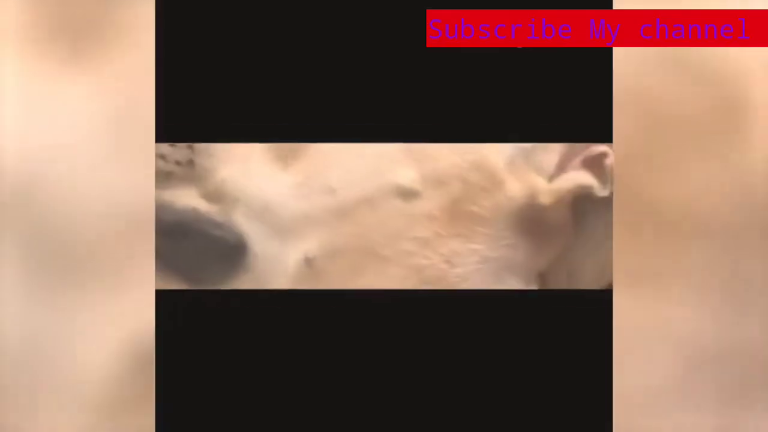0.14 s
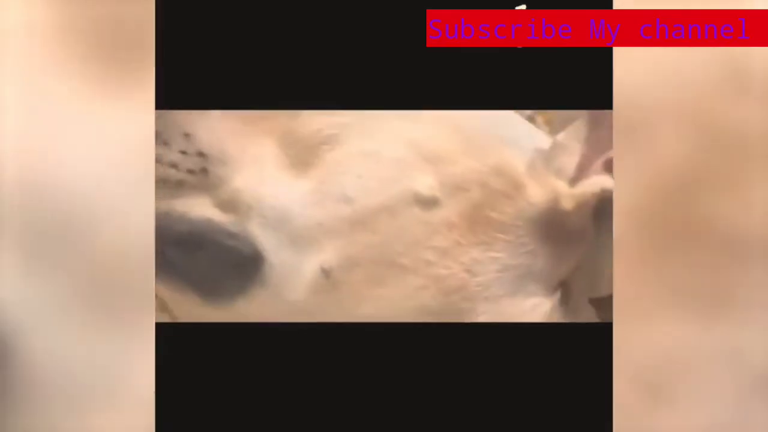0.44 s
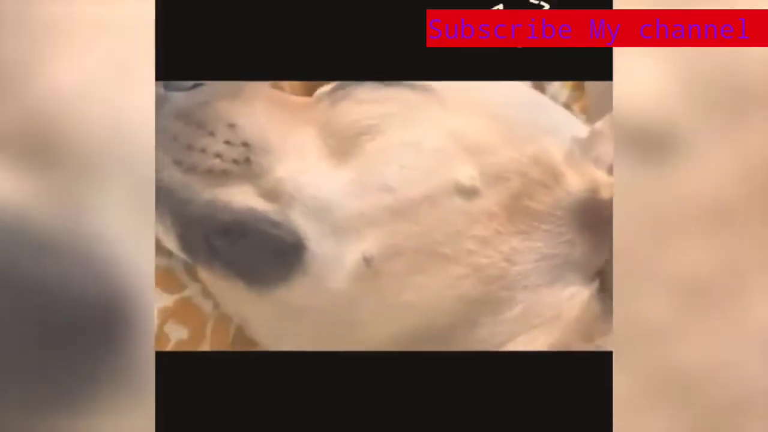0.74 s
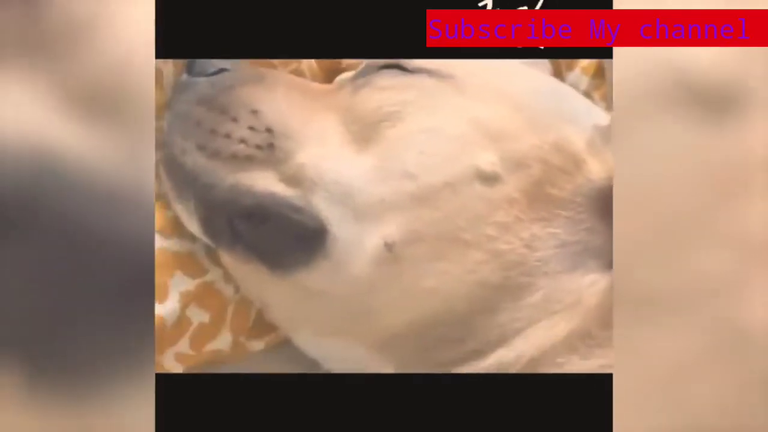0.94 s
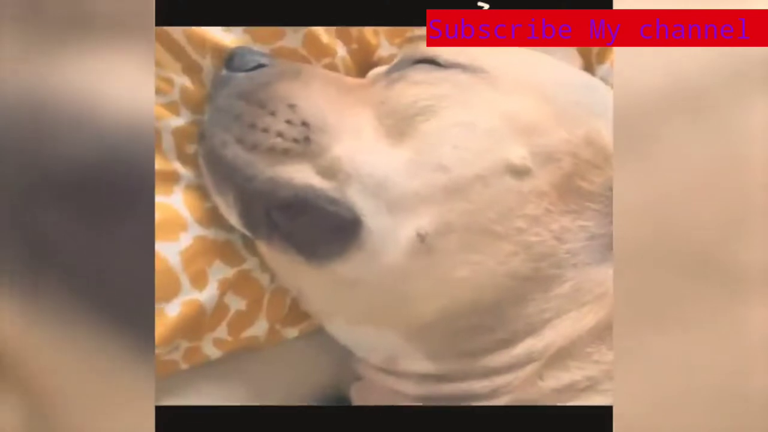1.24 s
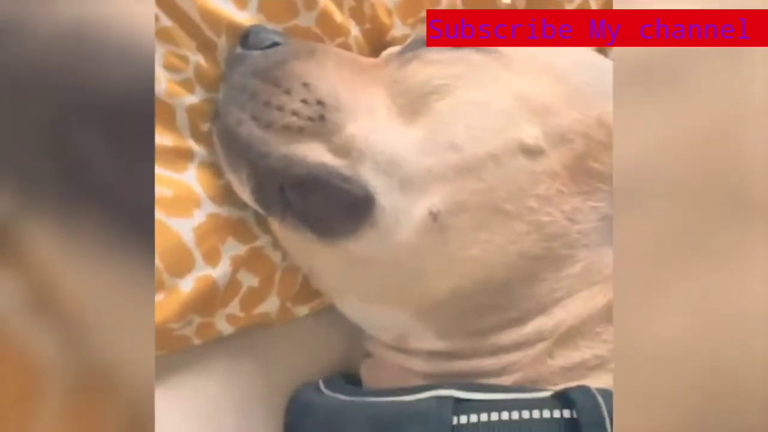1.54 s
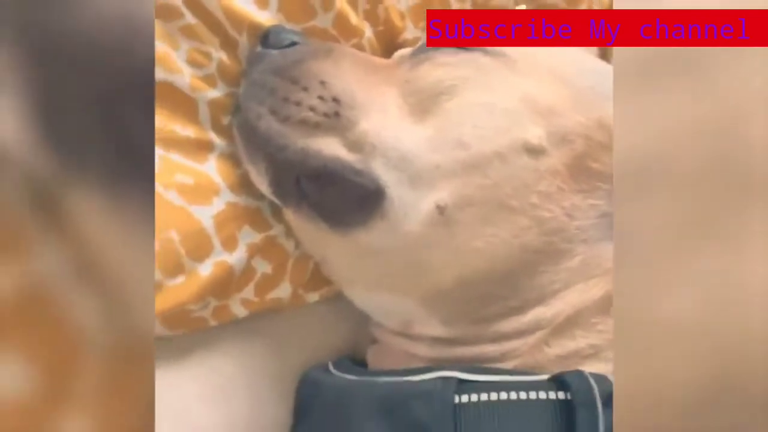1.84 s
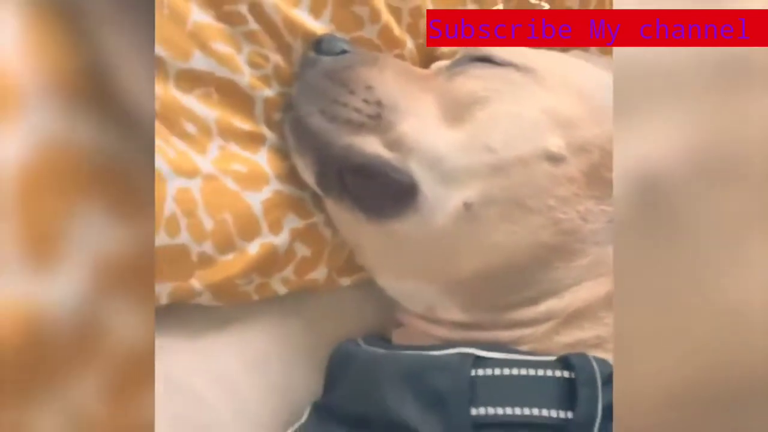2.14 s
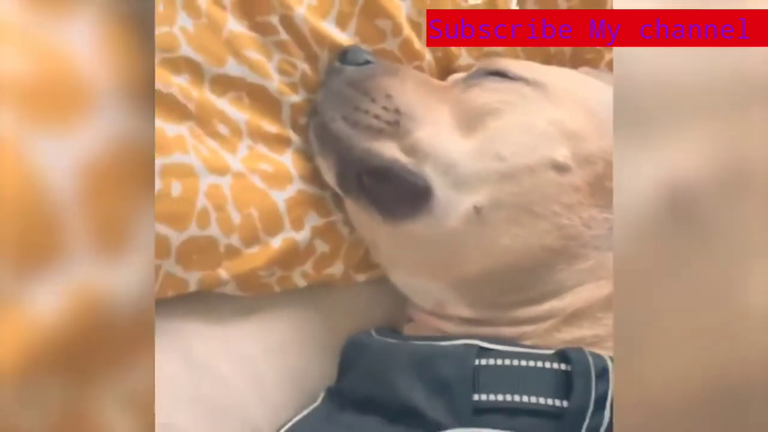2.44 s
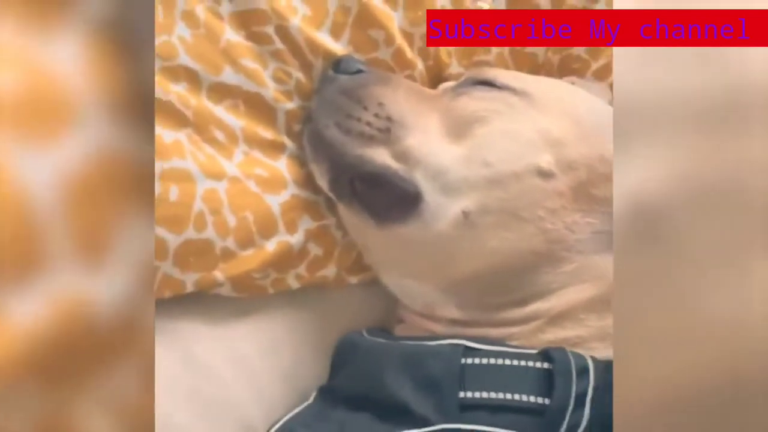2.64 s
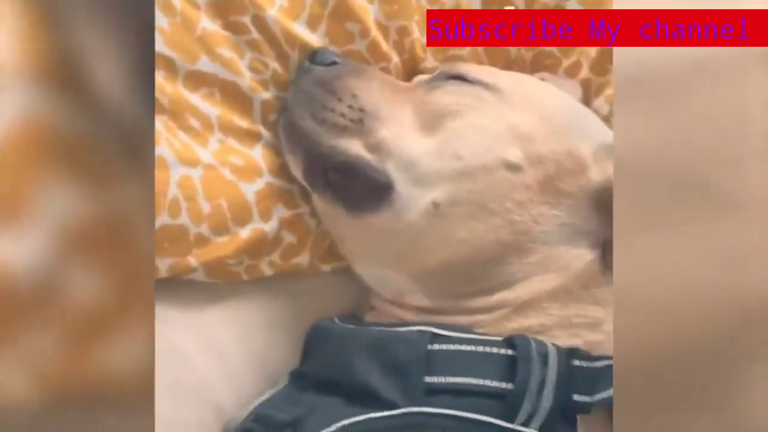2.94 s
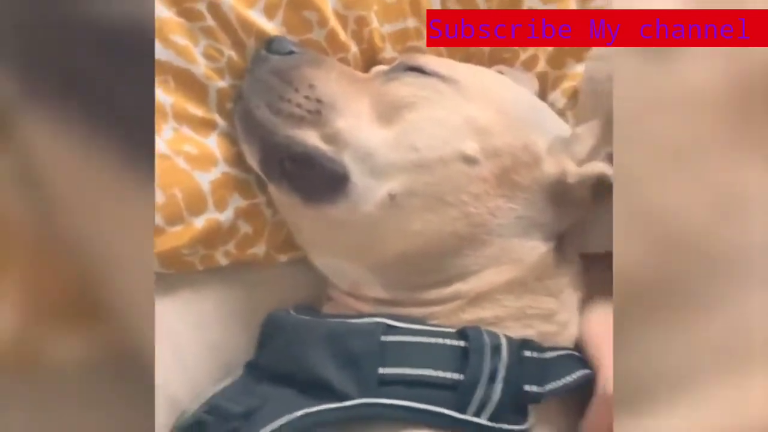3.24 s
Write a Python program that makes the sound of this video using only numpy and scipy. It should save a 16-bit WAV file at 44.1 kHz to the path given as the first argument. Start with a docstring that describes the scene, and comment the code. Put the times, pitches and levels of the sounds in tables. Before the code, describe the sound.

A sleeping dog snores once, close to the microphone. After faint room tone, the low, fluttering snore begins at about 0.2 seconds over a soft hum, swelling and wavering with brief catches and a nasal hiss. Around 2.2 seconds it slows to a rattle with faint wet ticks, ending in loose flaps near 2.6 seconds. Breath bumps the microphone, most strongly at the end, fading by about 3.2 seconds.

```python
"""A moment of quiet room tone and a short silence, then a softly humming room where a dog snores, asleep
close to a phone. Its soft palate flaps about 60-115 times a second, stalling now and then; each flap
sends a falling thud through the throat and a puff of hiss through the nose. The snore swells, slows to
a rattle with wet ticks and ends in a few loose flaps. Air from the nostrils buffets the microphone,
most at the end."""
import sys
import numpy as np
from scipy import signal
from scipy.fft import rfft, irfft, next_fast_len
from scipy.io import wavfile
from scipy.ndimage import uniform_filter1d, map_coordinates

SR = 44100
rng = np.random.default_rng(int(sys.argv[2]) if len(sys.argv) > 2 else 0)


def dump(signal):
    """Clip the signal to [-1, 1] and save it as 16-bit WAV at the path in sys.argv[1]."""
    limited = np.clip(np.atleast_2d(signal).T, -1, 1)
    pcm = np.round(limited * 32767).astype(np.int16)
    wavfile.write(sys.argv[1], SR, pcm)


N = 147735
TIME_S = np.arange(N) / SR
DOG_START_S, FLAPS_END_S = .1945, 2.59
SLOW_FAST_HZ = (65, 94)  # flap rates of a hard rattle and of a flowing snore


def amp(db):
    """Decibels to gain."""
    return 10 ** (np.asarray(db) / 20)


def unit(x):
    """Normalise to rms 1."""
    return x / np.sqrt(np.mean(x ** 2) + 1e-20)


def eq(points, hz):
    """Gain of an EQ curve drawn through (freq_hz, gain_db) points on a log axis."""
    freq_hz, gain_db = np.transpose(points)
    return amp(np.interp(np.log(hz + 1), np.log(freq_hz + 1), gain_db))


def automation(rows):
    """One lane, a value per sample, for each column after the time."""
    times, *columns = np.transpose(rows)
    return [np.interp(TIME_S, times, column) for column in columns]


def wobble(rate_hz):
    """Smooth random modulation."""
    knots = rng.standard_normal(int(N * rate_hz / SR) + 4)
    return map_coordinates(knots, [TIME_S * rate_hz])


def filtered(x, response):
    """Filter x with a complex response, a function of frequency."""
    size = next_fast_len(N + SR // 2)
    return irfft(rfft(x, size) * response(np.fft.rfftfreq(size, 1 / SR)), size)[..., :N]


def noise(colour):
    """Noise through an EQ curve, at rms 1."""
    return unit(filtered(rng.standard_normal(N), lambda hz: eq(colour, hz)))


def swell(start_s, peak_db, pitch_hz, length_s):
    """A low tone under a half-sine envelope."""
    age_s = TIME_S - start_s
    envelope = np.sin(np.pi * np.clip(age_s / length_s, 0, 1))
    return amp(peak_db) * envelope * np.sin(2 * np.pi * pitch_hz * age_s)


# Colour of the quiet room: freq_hz, gain_db
QUIET_ROOM_EQ = [(15, -42), (25, 1.5), (66, 5), (782, -36.5), (3080, -37.5), (4870, -48), (6720, -33.5),
                 (8570, -48), (10100, -38.5), (15500, -43.5)]


def quiet_room():
    """Faint rumble and hiss that stop dead."""
    return amp(-43 + wobble(9.3)) * noise(QUIET_ROOM_EQ) * (TIME_S < .175)


# Colour of the dog's room: freq_hz, gain_db
ROOM_EQ = [(41, -44), (70, -14), (123, 3), (205, -10), (244, -1.5), (266, -5), (418, -11), (446, -13.5),
           (518, -12), (747, -26), (940, -22), (1120, -24), (1620, -21), (2240, -29), (6200, -43.5),
           (6700, -45.5), (11900, -56.5), (12200, -62.5), (14300, -65), (14800, -68.5), (15600, -71),
           (22000, -120)]


def humming_room(level_db=-30, patch_db=2):
    """Room tone with a loose hum, swelling at random in small patches of time and frequency."""
    fader = amp(level_db + .26 * wobble(14))
    spectrogram = signal.stft(noise(ROOM_EQ), nperseg=1024)[2]
    patches = uniform_filter1d(rng.standard_normal(spectrogram.shape), 3, axis=0)
    patches = unit(uniform_filter1d(patches, 5, axis=1))
    return fader * unit(signal.istft(spectrogram * amp(patch_db * patches), nperseg=1024)[1][:N])


# The palate sticks, then lets go with a flap: release_s, pause_before_s
STALLS = [(.472, 0.02), (0.578, 0.019), (.707, .011), (.896, .01), (1.118, .02), (1.256, .015),
          (1.279, .022), (1.717, .022), (2.216, .015), (2.238, .021), (2.272, .034), (2.295, .021),
          (2.641, .05)]


def palate_flaps(rate_hz, uneven, jitter_cycles=.08, scatter_db=4.5):
    """An impulse per flap, and the phase in cycles; each stall holds the palate and restarts the beat."""
    chance = rng.standard_normal((N // 64 + 1, 2))
    cycles = np.cumsum(rate_hz) / SR
    origin = np.full(N, np.interp(DOG_START_S, TIME_S, cycles))
    free = (TIME_S > DOG_START_S) & (TIME_S < FLAPS_END_S)
    for release_s, pause_s in STALLS:
        origin[TIME_S >= release_s] = np.interp(release_s, TIME_S, cycles)
        free &= (TIME_S < release_s - pause_s) | (TIME_S >= release_s)
    phase = cycles - origin
    beats = np.flatnonzero((np.diff(np.floor(phase)) != 0) & free[1:]) + 1
    releases = [int(np.ceil(release_s * SR)) for release_s, _ in STALLS]
    onsets = np.union1d(beats, releases)
    timing, strength = chance[:len(onsets)].T * uneven[onsets]
    nudge = np.round(jitter_cycles * timing * SR / rate_hz[onsets]).astype(int)
    return np.bincount(np.clip(onsets + nudge, 0, N - 1), amp(scatter_db * strength), N), phase


# Colour of the throat: freq_hz, gain_db
THROAT_EQ = [(35, -30), (60, -6), (88, -1.5), (197, 2.5), (476, -18.5), (582, -29), (686, -39.5),
             (1000, -51.5), (1300, -68), (2200, -120)]


def throat(hz, start_cycles=.21):
    """Response of the soft-walled airway: low tones lag, so each thud falls in pitch."""
    lag_s = np.minimum(.001071 * (650.7 / (hz + 1)) ** 1.322, .01551)
    return eq(THROAT_EQ, hz) * np.exp(-2j * np.pi * (np.cumsum(lag_s) * hz[1] + start_cycles))


def throat_thuds(flaps, rate_hz, uneven, level_db, bright_db, rasp_db=-6.5, bass_trade=.38):
    """Flaps and rasp through the throat: a duller throat gives more bass, and slow flaps snap harder."""
    pulses = flaps * np.sqrt(SR / rate_hz)
    source = pulses + amp(rasp_db) * uneven * rng.standard_normal(N)
    bass = lambda hz: 1 / (1 + (hz / 129) ** 8)
    upper = lambda hz: 1 / (1 + (424 / (hz + 1)) ** 10)
    middle = lambda hz: 1 - upper(hz) - bass(hz)
    body = np.zeros(N)
    for band, boost_db in ((bass, -bass_trade * bright_db), (middle, 0), (upper, bright_db)):
        body += filtered(source * amp(level_db + boost_db), lambda hz: throat(hz) * band(hz))
    makeup = np.sqrt(np.mean(amp(level_db) ** 2) / np.mean(body ** 2))
    snap_send = np.interp(rate_hz, SLOW_FAST_HZ, [amp(6) - 1, 0]) * amp(level_db + bright_db)
    snap = filtered(pulses * snap_send, lambda hz: throat(hz) / (1 + (570 / (hz + 1)) ** 8))
    return makeup * (body + snap)


# Colour of the nose between its resonances: freq_hz, gain_db
NOSE_EQ = [(600, -46), (1200, -20), (3000, -14.5), (6300, -21), (6800, -23), (11500, -37), (15500, -49)]


def nose(air, resonances):
    """Air rings the nasal passages; the result has rms 1."""
    def response(hz):
        peaks = sum(amp(gain_db) / (1 + ((hz - centre_hz) / (width_hz / 2)) ** 2)
                    for centre_hz, width_hz, gain_db in resonances)
        return peaks + eq(NOSE_EQ, hz)
    return unit(filtered(air, response))


# Nose resonances early, mid-breath and in the slow rattle: centre_hz, width_hz, gain_db
NOSE_EARLY = [(1680, 250, -4), (3300, 270, -5), (3880, 410, -5), (5140, 470, -11.5), (6060, 470, -9)]
NOSE_MIDDLE = [(1669, 200, 0), (3203, 220, 0.5), (3800, 340, -12.5), (4610, 260, -8.5), (5660, 460, -8),
               (8200, 460, -27), (10300, 180, -29.5)]
NOSE_LATE = [(1650, 400, 0), (3230, 230, 0), (4050, 500, -6), (5000, 800, -9)]


def nose_hiss(flaps, phase, rate_hz, puff_s=.00095):
    """A puff of air with each flap; faster flapping brings up a steady flow and a mid-cycle puff."""
    early = np.interp(TIME_S, [.85, 1.7], [1, 0])
    late = np.interp(TIME_S, [2.17, 2.26], [0, 1])
    flow = np.interp(rate_hz, SLOW_FAST_HZ, [.65, 1])
    mid_cycle = (np.diff(np.floor(phase + .5), prepend=0) == 1) & (TIME_S < FLAPS_END_S)
    second_puffs = .45 * flow * (1 - .7 * early) * mid_cycle
    puffs = (flaps + second_puffs) * amp(2.5 * wobble(70))
    puff_shape = np.exp(-.5 * (np.arange(-300, 301) / SR / puff_s) ** 2)
    envelope = .6 * flow + np.convolve(puffs, puff_shape, "same")
    running_rms = np.sqrt(np.abs(uniform_filter1d(envelope ** 2, SR // 10)) + 1e-9)
    air = envelope / running_rms * rng.standard_normal(N)
    crossfades = np.sqrt(np.clip([early, 1 - early - late, late], 0, 1))
    stages = (NOSE_EARLY, NOSE_MIDDLE, NOSE_LATE)
    return sum(gain * nose(air, resonances) for gain, resonances in zip(crossfades, stages))


# Speed of the palate: time_s, flap_rate_hz
FLAP_RATE = [(.2, 73), (.3, 69), (.33, 81), (.39, 99), (.46, 115), (.55, 95), (.58, 100), (.61, 99),
             (.7, 104), (.74, 100.4), (.8, 94.5), (.88, 94), (.91, 80.8), (1.03, 85), (1.055, 98.4),
             (1.1, 89), (1.12, 79), (1.14, 80), (1.155, 103), (1.19, 101), (1.21, 92), (1.235, 82),
             (1.26, 66), (1.285, 65.7), (1.31, 68.5), (1.33, 90), (1.37, 101), (1.41, 98.5), (1.45, 89),
             (1.5, 84.7), (1.6, 91.5), (1.69, 93), (1.72, 70.4), (1.745, 82.7), (1.8, 86), (1.82, 94.3),
             (1.95, 95.8), (2.07, 91), (2.115, 96), (2.135, 78), (2.19, 78), (2.21, 61.7), (2.43, 61.2),
             (2.46, 66.6), (2.5, 68), (2.55, 63), (2.6, 61)]
# Roughness of the flapping: time_s, unevenness (0-1)
UNEVENNESS = [(.2, .45), (.33, .35), (.5, .2), (.62, .12), (.85, .1), (.9, .17), (1.0, .1), (1.1, .2),
              (1.3, .25), (1.36, .15), (1.66, .15), (1.72, .25), (1.82, .09), (2.1, .1), (2.19, .1),
              (2.25, .2), (2.35, .12), (2.55, .14), (2.62, .6)]
# Fader rides of the breath: time_s, level_db, upper_throat_db (relative to level), hiss_db
BREATH = [(.2, -28.5, -18.5, -56.5), (.32, -29, -16.5, -49), (.45, -24, -16, -47.5), (.55, -23, -27.5, -47),
          (.65, -19, -21, -45.5), (.77, -18, -20, -45), (.88, -16.5, -15.5, -48.5),
          (1.0, -18, -13.5, -49.5), (1.15, -15.5, -13, -50), (1.28, -17.5, -7.5, -50.5),
          (1.4, -15, -10.5, -49), (1.53, -15.5, -8.5, -49.5), (1.66, -14, -10.5, -46.5),
          (1.75, -16.5, -6, -44), (1.86, -13.5, -10.5, -44.5), (2.1, -13.5, -9.5, -42.5),
          (2.17, -14, -13, -45.5), (2.21, -17.5, -10, -49), (2.32, -15, -10, -46),
          (2.48, -14.5, -12, -47.5), (2.53, -16, -9.5, -50.5), (2.585, -21, -15.5, -52)]


def snore(neutral_upper_db=-16, hiss_trim_db=.5, fade_s=.17):
    """One breath: the flapping palate drives throat and nose, with wet ticks and loose flaps to end."""
    rate_hz, = automation(FLAP_RATE)
    uneven, = automation(UNEVENNESS)
    level_db, upper_db, hiss_db = automation(BREATH)
    flaps, phase = palate_flaps(rate_hz, uneven)
    thuds = throat_thuds(flaps, rate_hz, uneven, level_db, bright_db=upper_db - neutral_upper_db)
    ending = wet_ticks() + loose_flaps()
    hiss = amp(hiss_db + hiss_trim_db) * nose_hiss(flaps, phase, rate_hz)
    fade = np.exp(-np.maximum(TIME_S - FLAPS_END_S, 0) / fade_s)
    return fade * (thuds + hiss) + ending


# Strength of the draught: time_s, level_db
DRAUGHT = [(0.2, -38), (0.39, -34), (0.92, -37.5), (1.83, -28), (2.26, -30.5), (2.5, -22.5), (3.35, -50)]
# Colour of its rumble: freq_hz, gain_db
DRAUGHT_EQ = [(12, -36.5), (28, -15), (42, -12), (80, -5), (160, -21), (400, -68), (800, -120)]


def nostril_draught():
    """Air from the nostrils lays a lumpy rumble on the microphone."""
    level_db, = automation(DRAUGHT)
    return amp(level_db + 2.8 * wobble(16)) * noise(DRAUGHT_EQ)


# Gusts of breath: start_s, peak_db, pitch_hz, length_s
GUSTS = [(1.527, -26, 44.9, 0.073), (1.72, -12, 47.5, 0.047), (1.969, -16.5, 54.84, .04),
         (2.029, -16, 40.22, 0.072), (2.2, -15.5, 45.52, 0.11), (2.335, -7.5, 56.07, 0.037),
         (2.376, -18.5, 39.86, 0.045), (2.442, -11, 55.03, 0.036), (2.604, -8, 38, 0.026),
         (2.636, -6, 45.2, 0.015), (2.658, -9.5, 39.4, 0.052), (2.706, -9, 39, 0.031),
         (2.739, -16, 42, 0.035), (2.886, -15.5, 44.8, 0.0306), (3.02, -25, 40, 0.072),
         (3.14, -25.5, 36.2, 0.05)]


def gusts():
    """Breath buffets the microphone in short sub-bass bumps."""
    return sum(swell(*gust) for gust in GUSTS)


# Wet ticks: start_s, level_db
TICKS = [(2.216, -38), (2.291, -41), (2.456, -41), (2.58, -35)]


def wet_ticks(decay_s=.004):
    """Bright ticks ring through the nose, the last as the palate shuts."""
    envelope = sum(amp(level_db) * (TIME_S > start_s) * np.exp(-np.maximum(TIME_S - start_s, 0) / decay_s)
                   for start_s, level_db in TICKS)
    return envelope * nose(rng.standard_normal(N), resonances=[(4000, 500, 2), (5000, 600, -3)])


# Last flaps of the palate: start_s, peak_db, pitch_hz, length_s
LOOSE_FLAPS = [(2.585, -12.5, 113.5, .025), (2.612, -17.5, 98, 0.047), (2.632, -14, 140, 0.027)]


def loose_flaps():
    """The palate flaps loosely, closing the snore with soft low thumps."""
    return sum(swell(*flap) for flap in LOOSE_FLAPS)


def scene():
    """The quiet room, a short silence, then the dog in its humming room; mono."""
    opening = quiet_room()
    dog_in_room = snore() + nostril_draught() + gusts() + humming_room()
    return (opening + dog_in_room * (TIME_S > DOG_START_S))[None]


def record(dry, top_hz=15500):
    """The phone keeps nothing above its band limit."""
    return filtered(dry, lambda hz: hz < top_hz)


dry = scene()
out = record(dry)
dump(out)
```